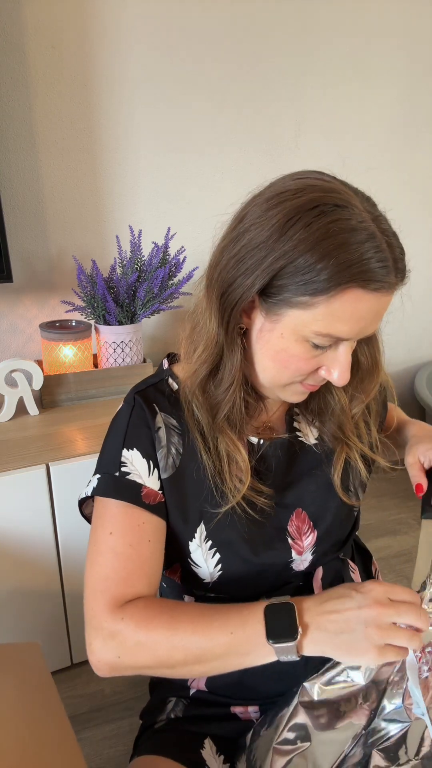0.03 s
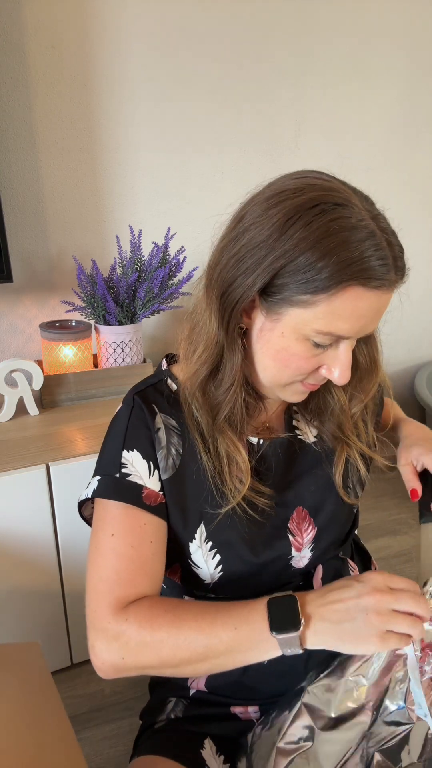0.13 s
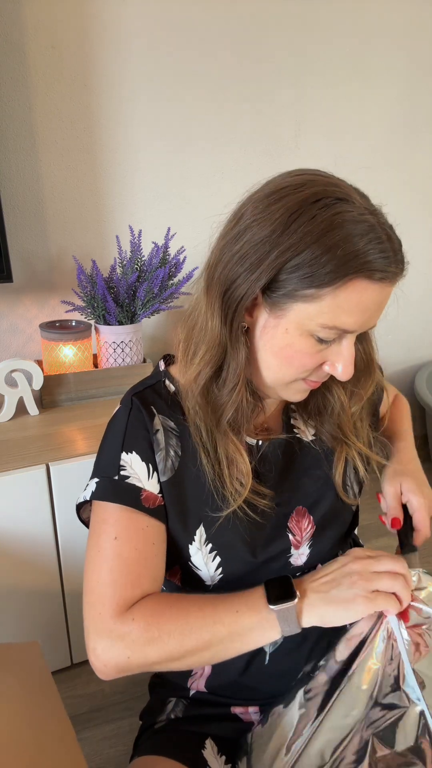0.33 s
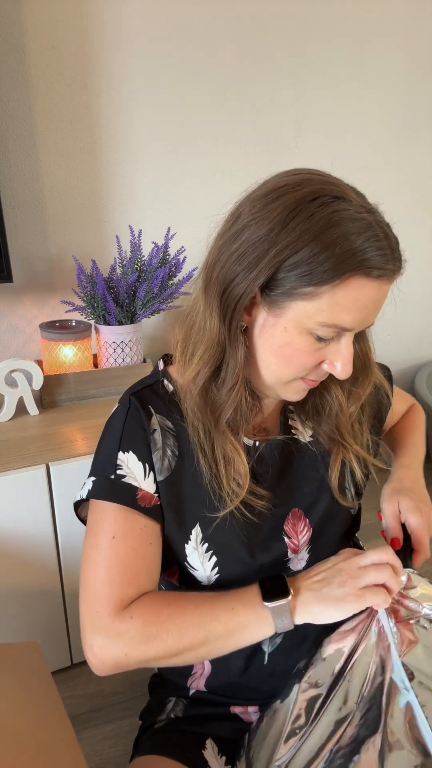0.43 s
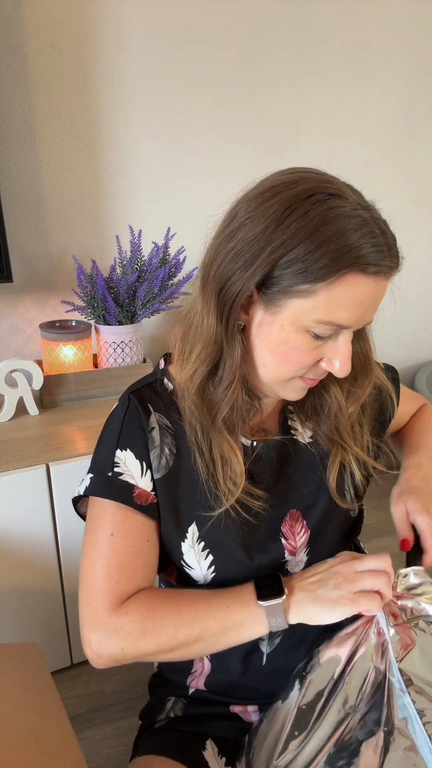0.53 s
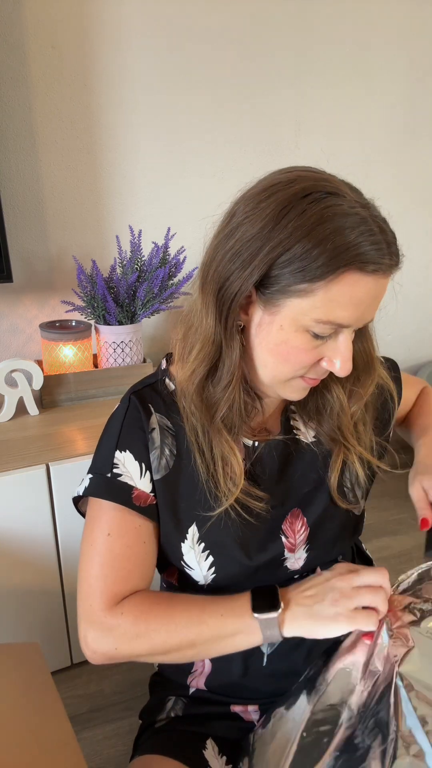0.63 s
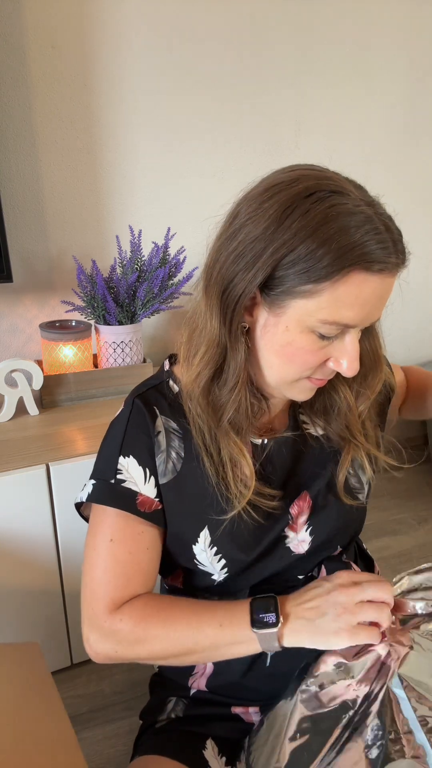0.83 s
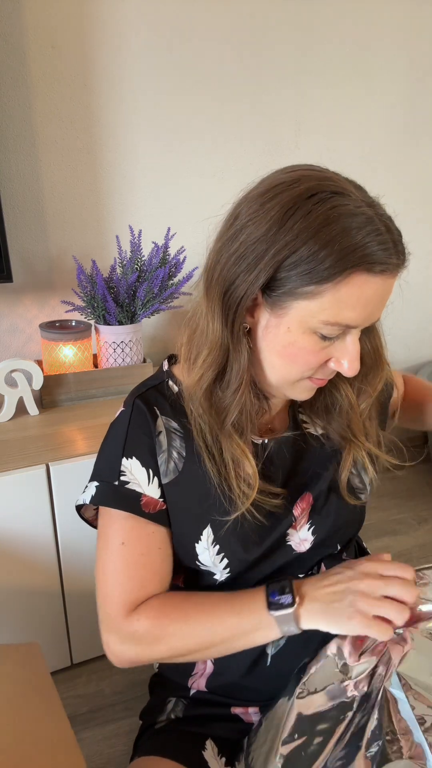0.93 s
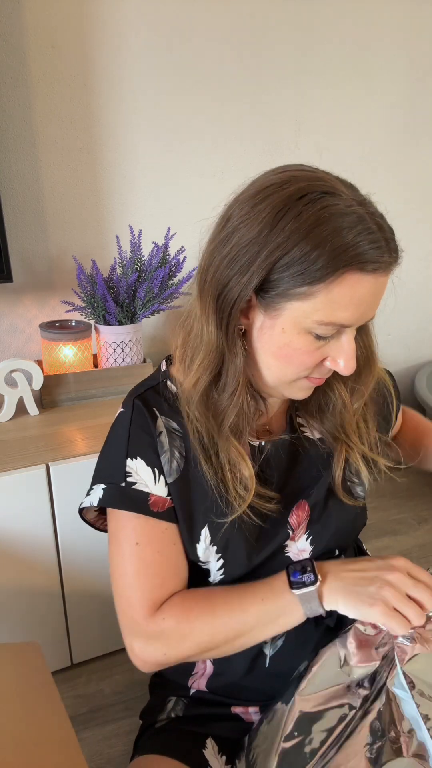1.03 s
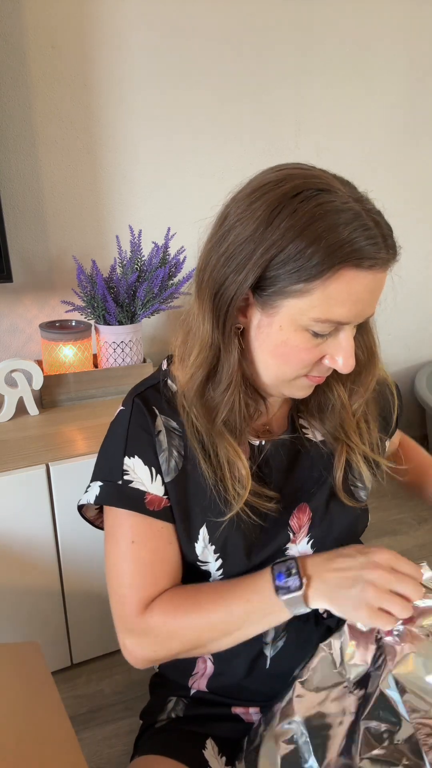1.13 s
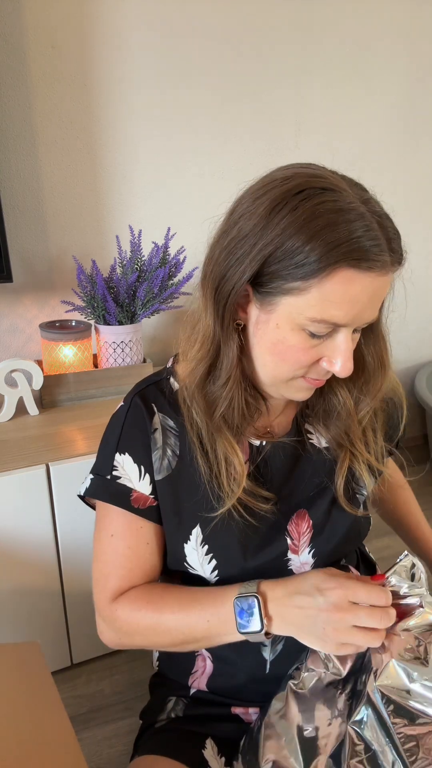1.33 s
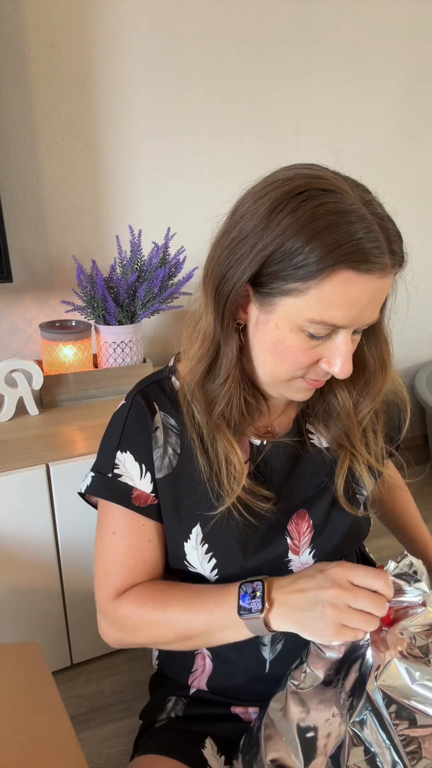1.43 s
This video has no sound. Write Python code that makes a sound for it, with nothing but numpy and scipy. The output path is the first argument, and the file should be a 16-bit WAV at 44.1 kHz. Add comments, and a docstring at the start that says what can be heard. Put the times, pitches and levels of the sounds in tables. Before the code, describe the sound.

Foil wrapping crackles and snaps as hands squeeze and pull it, with a faint hollow thrum beneath. One loud tug comes midway, followed by softer scattered crinkles, heard up close in a quiet room.

```python
"""Sharp snaps over a dense crackle: hands gather and pull a thin foil bag, close to one microphone
in a small quiet room. The snaps and crackle are creases buckling; broad panels pop and crumple
lower down, and the hollow bag puffs as it is squeezed and drums as it is dragged.
One hard tug in the middle is the loudest moment and sets the taut bag ringing."""
import sys
import numpy as np
from scipy import signal
from scipy.fft import rfft, irfft, next_fast_len
from scipy.io import wavfile
from scipy.ndimage import uniform_filter1d

SR = 44100
rng = np.random.default_rng(int(sys.argv[2]) if len(sys.argv) > 2 else 0)


def dump_mix(stems):
    """Bounce the given channels to the path in sys.argv[1] as a 16-bit WAV at rate SR."""
    frames = np.atleast_2d(stems).T  # one column per channel
    limited = np.clip(frames, -1, 1)  # hard clip at full scale
    pcm = np.round(limited * 32767).astype(np.int16)
    wavfile.write(sys.argv[1], SR, pcm)


N = 66150
GRAIN, LEAD = 2048, 128  # samples in one grain of sound, and how many come before its onset


def snaps():
    """Single creases snap over, each a sharp crack above the crackle."""
    # Each row: start in seconds, level in dB, pitch in Hz, ring time in seconds.
    creases = [(0.0809, -32, 9400, 0.004), (0.0922, -34, 6050, 0.0045), (.1312, -37.5, 4600, 0.0057),
               (0.1337, -36.5, 2000, .009), (.166, -38, 5000, .014), (0.173, -30.5, 5770, .009),
               (.1743, -44, 14500, .005), (0.1748, -31, 2400, .014), (0.199, -36, 6500, 0.0071),
               (0.2016, -36, 8000, .007), (0.2155, -30.5, 4000, 0.0072), (0.22, -30, 4500, 0.0045),
               (0.2268, -29.5, 5500, 0.0052), (0.2416, -28, 6000, 0.0064), (0.2655, -20, 6100, 0.0044),
               (0.29, -34, 4500, 0.0065), (0.331, -30, 4970, 0.012), (0.3497, -23.5, 5460, 0.006),
               (0.363, -27, 4450, 0.01), (0.4003, -25, 3500, 0.038), (0.4372, -29.5, 4900, .005),
               (0.468, -27.5, 5900, 0.017), (0.477, -29, 7500, .005), (0.4795, -22.5, 7400, 0.012),
               (0.4996, -28.5, 4180, 0.0099), (0.5182, -25, 5900, 0.013), (0.558, -30, 7040, 0.009),
               (0.5956, -29, 6500, 0.0087), (.6030, -28, 9000, 0.011), (0.6141, -26.5, 6000, 0.016),
               (0.6362, -24, 8100, 0.012), (0.665, -20.5, 4000, .012), (0.6686, -17, 5100, 0.0064),
               (.6710, -19.5, 2980, 0.0051), (0.674, -23, 6030, 0.0063), (.6789, -19.5, 7450, 0.0047),
               (.6996, -17.5, 2770, 0.0083), (0.7197, -21, 9400, 0.0095), (.7310, -18, 6500, 0.0089),
               (0.7359, -24, 5000, 0.0043), (.7410, -24, 6700, 0.0064), (0.7432, -17.5, 6050, 0.0065),
               (0.7654, -19, 3250, 0.012), (.7680, -14, 3000, 0.033), (0.7978, -28, 6950, 0.0063),
               (0.852, -34, 5000, 0.0088), (0.883, -25, 8000, 0.003), (0.899, -31.5, 5500, .007),
               (0.91, -32, 2740, 0.0097), (0.9189, -28.5, 1770, 0.013), (0.9422, -35.5, 6000, 0.007),
               (1.0076, -37.5, 4500, .009), (1.0158, -40, 3000, 0.007), (1.035, -31, 13900, .007),
               (1.041, -35, 4500, 0.009), (1.0610, -24, 6800, 0.0058), (1.07, -34, 6900, 0.0072),
               (1.0758, -28, 6000, .007), (1.085, -31, 6500, 0.008), (1.089, -24.5, 11000, 0.007),
               (1.0961, -23, 5630, .008), (1.1392, -32, 5000, .007), (1.1481, -30, 8000, 0.016),
               (1.2255, -33, 4500, .007), (1.2787, -31, 12000, 0.002), (1.2797, -34, 3240, 0.011),
               (1.299, -42, 2980, 0.0051), (1.3550, -33, 5560, 0.011), (1.3585, -36, 2800, 0.02),
               (1.3887, -40.5, 5300, .007), (1.4014, -43, 11000, .006), (1.4167, -46, 2950, 0.02),
               (1.423, -36, 7550, 0.0068), (1.425, -38, 2470, 0.0056), (1.4337, -38, 3440, 0.011),
               (1.4374, -36.5, 6600, 0.0055), (1.454, -38, 3470, .016), (1.4798, -26, 11500, .003),
               (1.489, -39, 7000, 0.009), (1.4950, -38, 4000, .007)]
    start, db, hz, ring_s = np.transpose(creases)
    cracks = buckles(hz, ring_s, travel_s=0.000593, octaves=0.52, skirt_db=-6.5, rattle=0.64,
                     skirt_octaves=2.06)
    return placed(start, db, cracks)


def crackle():
    """Fine creases give way as the hands work, now duller, now brighter."""
    # How hard the hands work the foil. Each row: time in seconds, level in dB.
    effort = [(0, -45.5), (.03, -54), (.072, -60), (.1, -50), (.16, -49), (.225, -31.5), (.27, -33.5),
              (.315, -38.5), (.36, -31), (.43, -31.5), (.47, -33.5), (.495, -38), (.54, -37.5),
              (.57, -26.5), (.595, -33.5), (.635, -26.5), (.662, -29), (.668, -25), (.765, -19.5),
              (.81, -30.5), (.86, -36.5), (.915, -36), (.98, -48.5), (1.03, -44), (1.095, -34),
              (1.13, -40.5), (1.195, -30), (1.25, -43), (1.29, -44), (1.345, -52.5), (1.39, -48.5),
              (1.5, -43.5)]
    # Spectrum of the fine creases. Each row: frequency in Hz, level in dB.
    tone = [(200, -36), (700, -1), (1300, 5), (1900, -1), (2900, 0), (3900, -0.5), (5000, 2.5),
            (6000, -1.5), (7200, 4), (8500, -3.5), (9500, 0.5), (10800, 1), (12500, -0.5), (14300, -5),
            (15700, -10.5)]
    # Treble against the rest of the crackle. Each row: time in seconds, gain in dB.
    brightness = [(0, -9), (.13, 0.5), (.23, -0.5), (.31, -3), (.43, -11), (.52, -0.5), (.62, 1.5),
                  (.75, -1), (.87, -1), (1.05, 2), (1.19, -2.5), (1.32, 0), (1.5, -1)]
    grains = swarm(per_s=2100, spread_db=4, ring_s=0.0067, pitch_hz=4760, scatter_octaves=0.91,
                   travel_s=0.0006146)
    grains = steadied(coloured(grains, tone), span_s=0.019)
    treble = filtered(grains, lambda hz: 1 - 1 / (1 + (hz / 8500) ** 8))
    return level(effort) * (grains - treble + level(brightness) * treble)


def crumple():
    """Broad folds bend and give a lower rustle."""
    # Bending of the panels. Each row: time in seconds, level in dB.
    bending = [(0, -40), (.05, -50), (.115, -57.5), (.19, -44.5), (.24, -34.5), (.3, -43), (.38, -35),
               (.44, -31), (.48, -34), (.53, -50.5), (.575, -36), (.61, -43.5), (.655, -29.5), (.695, -21),
               (.745, -29), (.785, -25), (.82, -37), (.89, -42), (.92, -35), (.98, -59.5), (1.03, -53.5),
               (1.1, -44.5), (1.15, -48.5), (1.195, -35.5), (1.25, -59), (1.29, -45), (1.34, -62.5),
               (1.44, -49), (1.5, -53)]
    # Spectrum of the folds. Each row: frequency in Hz, level in dB.
    tone = [(80, -31), (200, -3), (400, -0.5), (550, 1.5), (800, -2), (1000, -6.5), (1350, -7.5),
            (2000, -10.5), (4000, -12), (12000, -31)]
    folds = swarm(per_s=700, spread_db=3, ring_s=0.015, pitch_hz=820, scatter_octaves=1.16,
                  travel_s=0.004)
    return level(bending) * steadied(coloured(folds, tone), span_s=0.019)


def pops():
    """Whole panels flip over; the wave crosses the sheet treble first, a quick falling chirp."""
    # Each row: start in seconds, level in dB, pitch in Hz, bending-wave delay at 1 kHz in seconds.
    panels = [(.002, -30.5, 282, 0.0062), (0.0811, -38, 2300, 0.00094), (0.1312, -35.5, 447, 0.0044),
              (0.2, -33, 267, 0.0047), (0.3113, -28.5, 1540, 0.00198), (.5690, -34.5, 442, 0.00296),
              (1.249, -41, 320, .003), (.6880, -24.5, 605, 0.00402), (1.0619, -36, 1190, 0.00093),
              (1.281, -37.5, 1220, 0.00206), (1.3552, -37.5, 830, 0.0013)]
    start, db, hz, travel_s = np.transpose(panels)
    chirps = buckles(hz, ring_s=0.016, travel_s=travel_s, octaves=0.56, skirt_db=-48, rattle=0.26)
    return placed(start, db, chirps)


def pings():
    """A small taut facet rings briefly with one note as its crease lets go."""
    # Each row: start in seconds, level in dB, pitch in Hz.
    facets = [(.1332, -35.5, 2650), (.1747, -34, 2850), (.2654, -28, 7600), (.3499, -26, 5000),
              (.48, -28.5, 7200), (.8831, -31.5, 7160), (1.0611, -32, 4870), (1.0891, -30, 9100),
              (1.0962, -26, 5100), (1.3551, -38, 5360), (1.4798, -32, 7960), (1.48, -34, 6800)]
    start, db, hz = np.transpose(facets)
    t = np.maximum(np.arange(GRAIN) - LEAD, 0) / SR
    attack = 1 - np.exp(-t / 0.00013)
    notes = np.sin(2 * np.pi * hz[:, None] * t) * decay(t, ring_s=0.006) * attack
    return placed(start, db, notes)


def bag_ring(linewidth_hz=4):
    """As the tug shifts across the taut bag, one note after another swells and fades."""
    # Each row: pitch in Hz, level in dB, peak time in seconds, half-length in seconds.
    modes = [(214, -36, .735, .036), (332, -34.5, .71, .028), (453, -37.5, .79, .024), (533, -29, .74, .04),
             (563, -32, .712, .033), (635, -32.5, .705, .03), (773, -28.5, .71, .027),
             (1513, -38, .735, .018), (1712, -36, .76, .02), (2166, -38, .72, .03), (2724, -34, .77, .015)]
    t = np.arange(N) / SR
    sound = np.zeros(N)
    for hz, db, peak_s, half_s in modes:
        waver = np.cumsum(rng.standard_normal(N)) * np.sqrt(2 * np.pi * linewidth_hz / SR)
        note = unit(np.sin(2 * np.pi * hz * t + waver))
        sound += amp(db) * swell(peak_s, half_s) * note
    return sound


def puff():
    """The squeezed bag shoves air: a soft low flutter."""
    # Push of the air. Each row: time in seconds, level in dB.
    push = [(0, -40), (.1, -52.5), (.2, -51.5), (.26, -37), (.3, -48), (.35, -39.5), (.45, -44), (.51, -42),
            (.57, -53), (.625, -47), (.67, -27.5), (.725, -39.5), (.795, -31.5), (.84, -46), (.95, -50.5),
            (1.05, -64), (1.14, -48), (1.175, -56), (1.215, -40), (1.27, -54), (1.36, -59), (1.5, -62)]
    # Spectrum of the flutter. Each row: frequency in Hz, level in dB.
    tone = [(20, -51), (34, -44), (47, -8.5), (72, 1.5), (97, -6.5), (130, -7.5), (190, -14), (400, -22.5),
            (1500, -71)]
    return level(push) * steadied(coloured(rng.standard_normal(N), tone), span_s=0.036)


def drum():
    """A hollow low note of the bag swells with each drag."""
    # Each row: peak time in seconds, half-length in seconds, level in dB.
    drags = [(0.38, 0.019, -38.5), (0.447, 0.029, -33), (0.654, 0.028, -32.5), (0.725, 0.028, -37),
             (1.21, 0.011, -43.5)]
    # Resonance of the hollow bag. Each row: frequency in Hz, level in dB.
    tone = [(40, -40), (95, -23), (125, -3), (155, 2.5), (175, -7), (205, -24), (500, -41)]
    envelope = sum(amp(db) * swell(peak_s, half_s) for peak_s, half_s, db in drags)
    return envelope * steadied(coloured(rng.standard_normal(N), tone), span_s=0.042)


def finger_slide(from_s=0.0925, to_s=0.135):
    """A finger slides on the foil with a brief, narrow, grainy hiss."""
    t = np.arange(N) / SR
    friction = rng.standard_normal(N) ** 3  # cubing makes the noise spiky
    hiss = unit(filtered(friction, lambda hz: bump(hz, centre_hz=5800, octaves=0.22)))
    contact = uniform_filter1d(1.0 * ((t > from_s) & (t < to_s)), size=100)
    return amp(-44.5) * hiss * contact


def room(x, first_reflection_s=0.004):
    """The near walls return a short tail that lingers longest in the midrange."""
    # Each row: frequency in Hz, seconds to fall by 60 dB.
    reverb_times = [(100, 0.21), (1000, 0.51), (6000, 0.26), (15000, 0.28)]
    hz, t, bands = signal.stft(rng.standard_normal(SR // 2), SR, nperseg=256)
    tail = signal.istft(bands * decay(t, along(reverb_times, hz)[:, None]), SR, nperseg=256)[1]
    delayed = np.pad(x, (int(first_reflection_s * SR), 0))
    return signal.fftconvolve(delayed, tail / np.linalg.norm(tail))[:N]


def room_tone():
    """A faint, steady rumble lies behind the bag."""
    # Each row: frequency in Hz, level in dB.
    tone = [(20, -32), (32, -1), (55, -2), (120, -8), (500, -17), (1500, -20), (15000, -40)]
    return amp(-57.5) * coloured(rng.standard_normal(N), tone)


def buckles(pitch_hz, ring_s, travel_s, octaves, skirt_db, rattle, skirt_octaves=np.inf):
    """One grain per buckle: a spike and a brief rattle, whose lows travel slower through the sheet."""
    # Colour common to all buckles. Each row: frequency in Hz, gain in dB.
    foil_tone = [(100, -0.5), (600, 2), (1500, 2.5), (3000, 4.5), (3900, -1), (5000, 1), (7200, -1.5),
                 (8400, -2.5), (9500, -1), (10800, -8.5), (12500, -2), (14500, 0.5), (15700, 3)]
    t, hz = np.arange(GRAIN) / SR, np.fft.rfftfreq(GRAIN, 1 / SR)
    kick = rattle * rng.standard_normal((len(pitch_hz), GRAIN)) * decay(t, np.reshape(ring_s, (-1, 1)))
    kick[:, 0] = 2 * rng.choice([-1, 1], len(pitch_hz))  # the opening spike
    skirt = amp(skirt_db) * bump(hz, pitch_hz[:, None], skirt_octaves)
    colour = (bump(hz, pitch_hz[:, None], octaves) + skirt) * amp(along(foil_tone, hz))
    # Bending waves arrive travel_s late at 1 kHz, twice as late two octaves down.
    dispersion = np.exp(-4j * np.pi * np.reshape(travel_s, (-1, 1)) * np.sqrt(1000 * hz))
    return np.roll(irfft(rfft(kick) * colour * dispersion), LEAD, axis=1)


def swarm(per_s, spread_db, ring_s, pitch_hz, scatter_octaves, travel_s):
    """Countless small buckles of random time, size and pitch."""
    count = int(per_s * N / SR)
    start = rng.uniform(0, N / SR, count)
    size, detune = np.clip(rng.standard_normal((2, count)), -2, 2)
    hz = pitch_hz * 2 ** (scatter_octaves * detune)
    grains = buckles(hz, ring_s, travel_s, octaves=0.89, skirt_db=-3, rattle=0.56)
    return placed(start, spread_db * size, grains)


def placed(start_s, db, grains, window_s=0.003):
    """Sum grains at their starts; db is each one's rms if all its energy fell within window_s."""
    index = np.round(start_s * SR).astype(int)[:, None] + np.arange(GRAIN)
    gain = amp(db) * np.sqrt(window_s * SR) / np.linalg.norm(grains, axis=1)
    track = np.bincount(index.ravel(), (grains * gain[:, None]).ravel(), N + GRAIN)
    return track[LEAD:LEAD + N]


def amp(db):
    """Decibels to gain."""
    return 10 ** (np.asarray(db) / 20)


def unit(x):
    """Scale to rms 1."""
    return x / np.sqrt(np.mean(x ** 2) + 1e-20)


def decay(t, ring_s):
    """A fall of 60 dB every ring_s."""
    return np.exp(-np.log(1000) * t / ring_s)


def swell(peak_s, half_s):
    """A bell in time, about 4 dB down at half_s either side of its peak."""
    return np.exp(-0.5 * ((np.arange(N) / SR - peak_s) / half_s) ** 2)


def bump(hz, centre_hz, octaves):
    """A bell on a log-frequency axis."""
    return np.exp(-0.5 * (np.log2((hz + 1) / centre_hz) / octaves) ** 2)


def along(points, hz):
    """(Hz, value) points read on a log axis."""
    point_hz, values = np.transpose(points)
    return np.interp(np.log(hz + 1), np.log(point_hz + 1), values)


def level(points):
    """(seconds, dB) points as a gain per sample."""
    times, db = np.transpose(points)
    return amp(np.interp(np.arange(N) / SR, times, db))


def filtered(x, response):
    """x through a gain given as a function of frequency."""
    size = next_fast_len(N + SR // 2)
    return irfft(rfft(x, size) * response(np.fft.rfftfreq(size, 1 / SR)), size)[:N]


def coloured(x, tone):
    """x shaped by (Hz, dB) points, at rms 1."""
    return unit(filtered(x, lambda hz: amp(along(tone, hz))))


def steadied(x, span_s):
    """x with swells slower than span_s evened out."""
    power = np.abs(uniform_filter1d(x ** 2, int(span_s * SR)))
    return x / np.sqrt(power + 1e-6)


def scene():
    """The bag up close, the walls just behind it and the quiet of the room, in mono."""
    foil = snaps() + pings() + pops() + crackle() + crumple() + bag_ring() + finger_slide()
    background = room_tone()
    return (foil + amp(-11.5) * room(foil) + puff() + drum() + background)[None]


def record(dry, top_hz=15780):
    """One microphone channel, with nothing kept above top_hz."""
    return filtered(dry[0], lambda hz: hz < top_hz)[None]


dry = scene()
out = record(dry)
dump_mix(out)
```